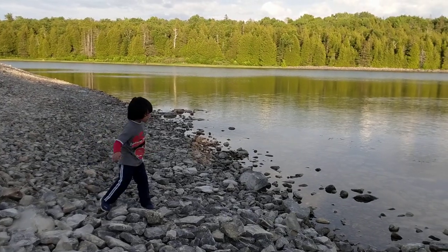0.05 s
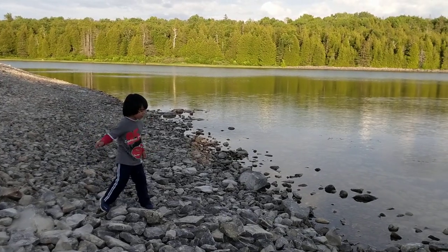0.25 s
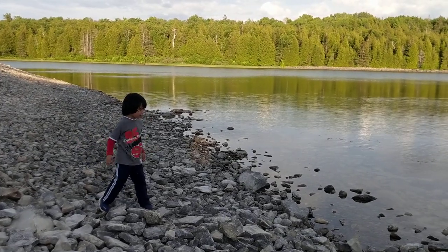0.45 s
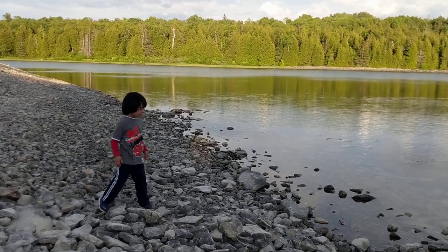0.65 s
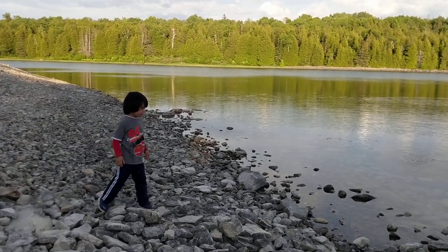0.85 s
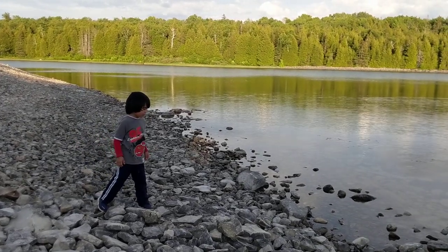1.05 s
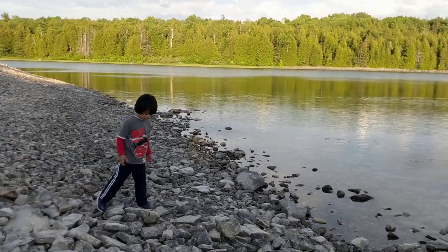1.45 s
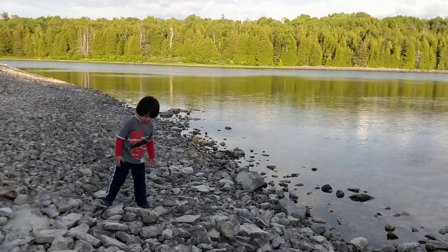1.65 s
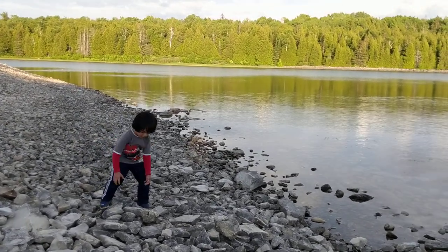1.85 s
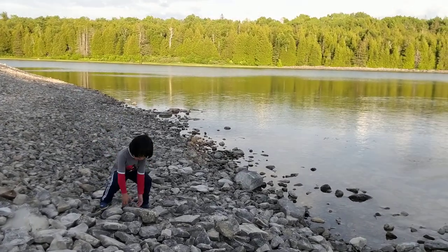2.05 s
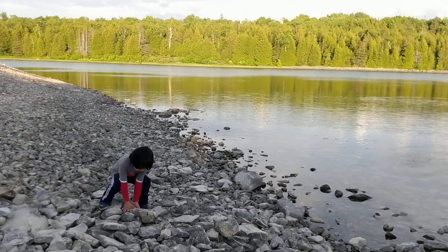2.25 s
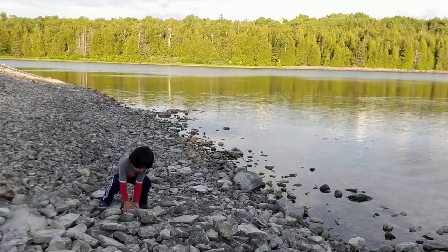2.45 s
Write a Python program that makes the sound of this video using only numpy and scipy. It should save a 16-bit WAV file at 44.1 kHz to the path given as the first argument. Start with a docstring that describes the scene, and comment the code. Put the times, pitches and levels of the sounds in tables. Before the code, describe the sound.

Stones land on a rocky shore with sharp clacks, then smaller bounces fade into quiet.

```python
"""Thrown stones land on a quiet rocky lake shore, over a faint hush. Each knock is a dead snap with a
low thud and a little crushed grit, scattered by the stone bed. The hardest clack rings a flat slab and
overloads the microphone as the heaviest stone grinds on; a later blow rings a boulder. Smaller bounces
follow as the stones tumble to rest. Then a soft hiss swells, a far bird whistles two falling notes,
and after each note a shoe shifts on the stones."""
import sys
import numpy as np
from scipy import signal
from scipy.fft import rfft, irfft
from scipy.io import wavfile
from scipy.ndimage import uniform_filter1d

SR = 44100
rng = np.random.default_rng(int(sys.argv[2]) if len(sys.argv) > 2 else 0)


def unload_audio(sound):
    """Save the sound as a 16-bit wav file, at the path given as the first command line argument."""
    columns = np.transpose(np.atleast_2d(sound))
    # keep every value between -1 and 1, then stretch to whole-number steps
    steps = np.round(np.clip(columns, -1, 1) * 32767)
    wavfile.write(sys.argv[1], SR, steps.astype(np.int16))


N = 110250


def stones():
    """Impact excitation: every landing knocks, and the hardest drive the modes of large rocks."""
    # landings and bounces: start_s, level_db, pitch_hz, pitch_q, edge_hz, thud_db, scatter_db, grit_db
    knocks = [ (0.014, -20, 1170, 3.2, 1950, 1.5, -0.5, -22.5), (.036, -20.5, 840, 2.3, 1740, 4, 0.5, -21),
              (0.0773, -11.5, 950, 0.69, 2010, 1.5, 0.5, -18),
              (0.086, -7.5, 1560, 2.5, 3600, -11.5, -3, -34), (.106, -21, 1360, 1.3, 1930, 6, -2, -32),
              (.204, -6, 1990, 7.5, 3700, -12, 3.5, -27), (0.2046, 6, 830, 2, 1500, -11, -7.5, -44),
              (0.2258, -22, 1940, 1.2, 4200, 2.5, 6, -27), (0.2782, 10, 1470, 1.5, 4360, -9.5, -1, -24),
              (0.2817, 0, 2600, 1.4, 5400, -16, -13, -38), (.2884, 11, 1600, 2.4, 4880, -40.5, -2.5, -21),
              (.294, 3, 1800, 2, 4600, -14, -5.5, -33), (0.2978, 1.5, 1690, 2.6, 5300, -9, -10.5, -7),
              (.302, -6, 2280, 2.3, 4400, -8.5, -4, -11), (0.3062, -5.5, 1220, 2.2, 2500, -17, -6, -25.5),
              (.334, -10, 2524, 5.4, 2830, -28, -3, -29), (0.347, -23, 5090, 3, 6300, -16, -11, -18),
              (0.365, -27.5, 1800, 3.3, 2483, -12, -1, -24), (0.405, -21.5, 2400, 0.8, 5500, -24, -7, -14),
              (0.4354, -24.5, 5030, 1.6, 6480, -11, -4.5, -19.5),
              (.510, -25.5, 4660, 1.6, 6300, -17, -3.5, -19), (0.5231, 7, 1010, 1.74, 2106, -16.5, -5, -33),
              (0.5316, -2.5, 1120, 1, 2700, -23.5, 3.5, -28),
              (0.5358, 6.5, 1870, 2.15, 4400, -15, -2.5, -33), (.5374, 3, 1610, 9.9, 2920, -15, -16.5, -32),
              (.5785, -9, 1060, 0.66, 2350, -7, 1, -19), (.5805, -14, 1950, 1.24, 5850, -11, -6, -13),
              (.595, -17, 924, 2.9, 1500, -14, -1.5, -17), (.606, -21.5, 1214, 1.5, 2700, -26, 1.5, -37),
              (0.6319, -22, 1270, 2.8, 1670, -3, 4, -15.5), (0.7223, -11.5, 1090, 0.78, 2065, 0, 3, -23.5),
              (0.7746, -28, 950, 2, 1500, -1, 5.5, -33), (0.8, -4.5, 1514, 4.1, 2470, -21.5, -8, -25.5),
              (0.8342, -15.5, 2150, 1.8, 2450, -26, -12, -42),
              (.835, -16.5, 1005, 3.3, 1490, -15.5, -4, -36), (0.86, -29, 1000, 1.6, 2370, -3, -6, -26),
              (0.9061, -13.5, 1080, 4.5, 2470, -5, -5, -22), (0.9415, -19.5, 987, 2, 2010, -6.5, -5.5, -20),
              (0.954, -26, 1164, 1.5, 1767, -4, -2, -27), (.976, -32.5, 998, 1.3, 1591, 4.5, 0, -30.5),
              (1.4286, -19, 2250, 3.3, 2800, -24, -10, -44),
              (1.429, -18, 1120, 2.5, 1600, -23.5, -6, -40.5), ]
    # modes of the slab: frequency_hz, relative_db
    slab_modes = [(609, -14), (1015, -12), (1372, 1), (1765, -2), (1946, -2), (2257, -5), (2505, -11),
                  (2750, -7), (3210, -9), (3650, -12), (4486, -10), (4750, -9)]
    # blows on the slab: start_s, level_db
    slab_blows = [(0.2789, 12), (0.2894, 0.5)]
    # modes of the boulder: frequency_hz, relative_db
    boulder_modes = [(730, -1.5), (859, 0), (1093, -1), (1432, -2), (1590, 0), (1745, -5), (2110, -5)]
    out = np.zeros(N)
    for start_s, *blow in knocks:
        add(out, start_s, knock(*blow))
    for start_s, level_db in slab_blows:
        add(out, start_s, ring(slab_modes, level_db))
    add(out, start_s=0.5365, sound=ring(boulder_modes, level_db=4.5))
    add(out, start_s=0.288, sound=crunch(length_s=0.028, level_db=-2))
    return out


def knock(level_db, pitch_hz, pitch_q, edge_hz, thud_db, scatter_db, grit_db, size=4096):
    """A brief contact radiates a broadband pulse: snap and bed thud, with grit and reflections."""
    # decay of reflections from nearby stones: frequency_hz, t60_s
    near_decay = [(150, 0.031), (400, 0.088), (1000, 0.051), (2500, 0.022), (6000, .028), (15000, 0.017)]
    # decay of reflections from the wider beach: frequency_hz, t60_s
    far_decay = [(150, 0.33), (400, 0.39), (1000, 0.14), (2500, 0.11), (6000, .06), (15000, .05)]
    snap_low_hz, thud_low_hz, thud_top_hz, far_db = 699, 105, 410, -12
    hz = np.fft.rfftfreq(size, 1 / SR) + 1
    snap = resonance(hz, pitch_hz, pitch_q)
    snap = snap / np.hypot(1, (hz / edge_hz) ** 8) / np.hypot(1, (snap_low_hz / hz) ** 6.5)
    thud = amp(thud_db) * resonance(hz, centre_hz=270, q=1.3)
    thud = thud / np.hypot(1, (hz / thud_top_hz) ** 4) / np.hypot(1, thud_low_hz / hz)
    pulse = unit(minimum_phase(np.hypot(snap, thud)))
    near = unit(signal.fftconvolve(pulse, scatter(near_decay)))
    far = unit(signal.fftconvolve(pulse, scatter(far_decay)))
    crack = unit(grit(size) * decay(np.arange(size) / SR, t60_s=0.018))
    out = amp(scatter_db) * (near + amp(far_db) * far)
    add(out, 0, pulse)
    add(out, 0, amp(grit_db) * crack)
    return amp(level_db) * out


def ring(modes, level_db, t60_s=0.052, rise_s=0.0004, size=8192):
    """Free vibration: a struck rock rings briefly as a sum of damped normal modes."""
    t = np.arange(size) / SR
    tones = sum(amp(db) * np.sin(2 * np.pi * (hz * t + rng.random())) for hz, db in modes)
    onset = 1 - np.exp(-(t / rise_s) ** 2)
    return amp(level_db) * unit(tones * decay(t, t60_s) * onset)


def crunch(length_s, level_db, size=4096):
    """Sliding friction: grit grinds under a moving stone and fades."""
    fade = np.clip(1 - np.arange(size) / SR / length_s, 0, 1)
    return amp(level_db) * unit(grit(size) * fade)


def grit(size, spread_db=3.5):
    """Superposed random impulses: uneven grains of crushed sand sum to a bright noise."""
    # spectrum of crushed sand: frequency_hz, relative_db
    spectrum = [(500, -30.5), (2500, -1), (4700, 2.5), (7000, -14.5), (9200, -14), (11000, -19),
                (12000, -33), (15500, -41)]
    grains = rng.standard_normal(size) * amp(spread_db * rng.standard_normal(size))
    grain_pulse = minimum_phase(amp(log_interp(spectrum, np.fft.rfftfreq(size, 1 / SR))))
    return signal.fftconvolve(grains, grain_pulse)[:size]


def scatter(decay_times, delay_s=0.0008, size=12288):
    """Diffuse scattering: many small reflections merge, each band dying at its own rate."""
    hz, t, bands = signal.stft(rng.standard_normal(size), SR, nperseg=128)
    damped = bands * decay(t, log_interp(decay_times, hz)[:, None])
    tail = signal.istft(damped, SR, nperseg=128)[1][:size]
    return tail * np.clip(np.arange(size) / SR / delay_s - 1, 0, 1)


def footsteps(size=4096):
    """Soft contact excites mainly low frequencies: each dull push of a shoe swells and fades."""
    # shifts of a shoe on the stones: start_s, length_s, level_db, pitch_hz
    steps = [(1.561, 0.052, -62, 203), (2.056, 0.051, -56, 222.2)]
    hz = np.fft.rfftfreq(size, 1 / SR) + 1
    out = np.zeros(N)
    for start_s, length_s, level_db, pitch_hz in steps:
        progress = np.minimum(np.arange(size) / SR / length_s, 1)
        swell = np.sin(np.pi * np.sqrt(progress)) ** 2
        dull = irfft(rfft(rng.standard_normal(size)) * resonance(hz, pitch_hz, q=1.85))
        add(out, start_s, amp(level_db) * dull / dull.std() * swell)
    return out


def bird(from_hz=5400, to_hz=4510, waver_depth=0.006):
    """Frequency modulation of a pure tone: thin, wavering whistles slide down and level off."""
    # whistled notes: start_s, length_s, level_db
    notes = [(1.495, 0.072, -70), (1.816, .07, -69.5)]
    out = np.zeros(N)
    for start_s, length_s, level_db in notes:
        progress = np.linspace(0, 1, int(length_s * SR))
        waver = uniform_filter1d(rng.standard_normal(N), size=200)[:len(progress)]
        glide_hz = from_hz + (to_hz - from_hz) * np.sin(np.pi * progress / 2)
        pitch_hz = glide_hz * (1 + waver_depth * waver / waver.std())
        swell = np.sqrt(abs(np.minimum(2 * np.sin(np.pi * progress), 1)))
        add(out, start_s, amp(level_db) * swell * np.sin(2 * np.pi * np.cumsum(pitch_hz) / SR))
    return out


def shore():
    """Incoherent noises add in power: a faint hush and a hiss that swells over it late."""
    # spectrum of the hush: frequency_hz, relative_db
    hush_spectrum = [(20, -4), (60, -1.5), (130, -3.5), (300, -9.5), (700, -11), (1200, -12.5), (3000, -19),
                     (5000, -19), (8000, -25), (15500, -25.5)]
    # envelope of the hush: time_s, level_db
    hush_levels = [(0, -59.5), (.35, -62), (0.679, -58), (.95, -61.5), (1.05, -68.5), (1.601, -65),
                   (2.5, -68)]
    # spectrum of the hiss: frequency_hz, relative_db
    hiss_spectrum = [(30, -20), (150, -2.5), (320, 0.5), (650, -10), (1400, -15.5), (2250, -10.5),
                     (3100, -17), (4650, -12), (6500, -19.5), (8500, -28.5), (15500, -38.5)]
    # envelope of the hiss: time_s, level_db
    hiss_levels = [(0, -82), (1.2, -80.5), (1.4, -71.5), (1.6, -65), (2.0, -65), (2.25, -72.5),
                   (2.5, -77.5)]
    hush = air(hush_spectrum, hush_levels, patchy_db=1.3)
    hiss = air(hiss_spectrum, hiss_levels, patchy_db=1.2)
    return hush + hiss


def air(spectrum, levels, patchy_db):
    """Amplitude modulation: bands of soft outdoor noise drift at random under a slow envelope."""
    hz, _, bands = signal.stft(rng.standard_normal(N), SR, nperseg=1024)
    patches = uniform_filter1d(rng.standard_normal(bands.shape), size=10, axis=0)
    patches = uniform_filter1d(patches, size=8, axis=1)
    bands *= amp(log_interp(spectrum, hz)[:, None] + patchy_db * patches / patches.std())
    noise = signal.istft(bands, SR, nperseg=1024)[1][:N]
    envelope = amp(np.interp(np.arange(N) / SR, *np.transpose(levels)))
    return noise / noise.std() * envelope


def resonance(hz, centre_hz, q):
    """Band-pass gain of a damped resonator with quality factor q."""
    return 1 / np.sqrt(1 + (q * (hz / centre_hz - centre_hz / hz)) ** 2)


def minimum_phase(gain):
    """Minimum phase gives the sharpest-starting pulse that has this spectrum."""
    log_gain = np.log(np.maximum(gain, 1e-5))
    mirrored = np.concatenate([log_gain, log_gain[-2:0:-1]])
    spectrum = np.exp(np.conj(signal.hilbert(mirrored)))
    return np.fft.ifft(spectrum).real[:len(gain)]


def decay(t, t60_s):
    """Exponential damping: a fall of 60 dB in t60_s."""
    return np.exp(-np.log(1000) * t / t60_s)


def amp(db):
    """Decibels as an amplitude ratio."""
    return 10 ** (np.asarray(db) / 20)


def unit(x):
    """Normalisation to unit energy."""
    return x / np.sqrt(np.sum(x ** 2) + 1e-20)


def log_interp(points, hz):
    """Interpolation on a logarithmic frequency axis."""
    point_hz, values = np.transpose(points)
    return np.interp(np.log(hz + 1), np.log(point_hz + 1), values)


def add(mix, start_s, sound):
    """Superposition: a sound joins the mix at start_s."""
    part = mix[max(round(start_s * SR), 0):][:len(sound)]
    part += sound[:len(part)]


def scene():
    """Sound pressures add: stones, bird, quiet shore and a shifting shoe, in mono."""
    return (stones() + bird() + shore() + footsteps())[None]


def record(dry, overload=0.66, bass_cut_hz=70, cutoff_hz=16000):
    """Clipping: the hardest clack overloads the microphone; a bass cut and a band limit follow."""
    clipped = np.clip(dry, -overload, overload)
    thinned = signal.lfilter(*signal.butter(1, bass_cut_hz, "highpass", fs=SR), clipped)
    lowpass = signal.firwin(255, cutoff_hz, window=("kaiser", 9), fs=SR)
    return signal.oaconvolve(thinned, lowpass[None], "same")


dry = scene()
out = record(dry)
unload_audio(out)
```